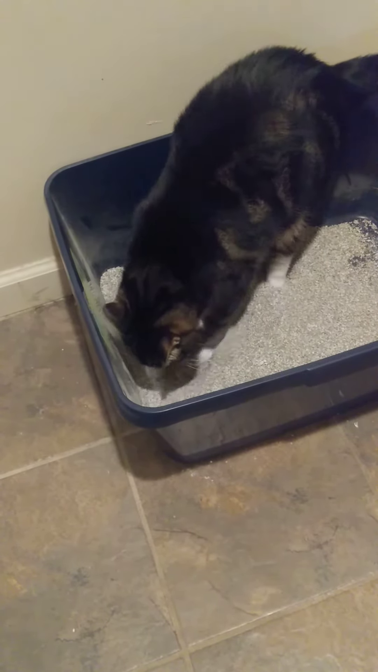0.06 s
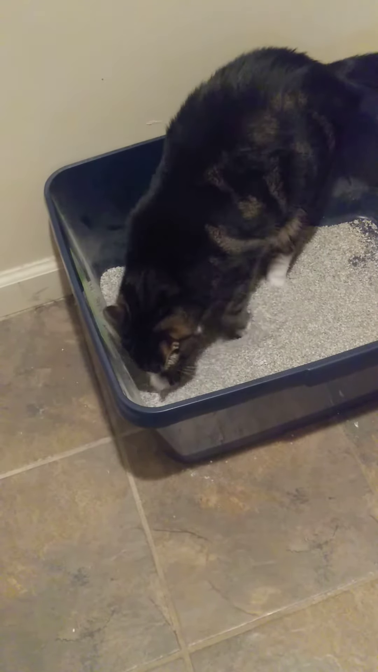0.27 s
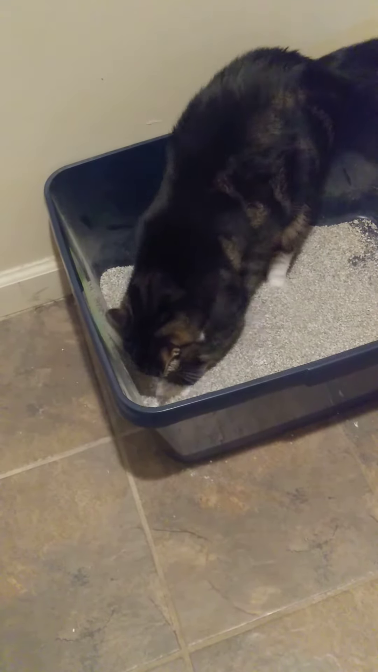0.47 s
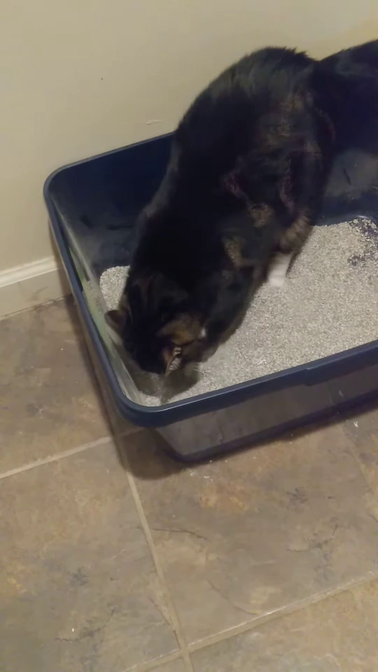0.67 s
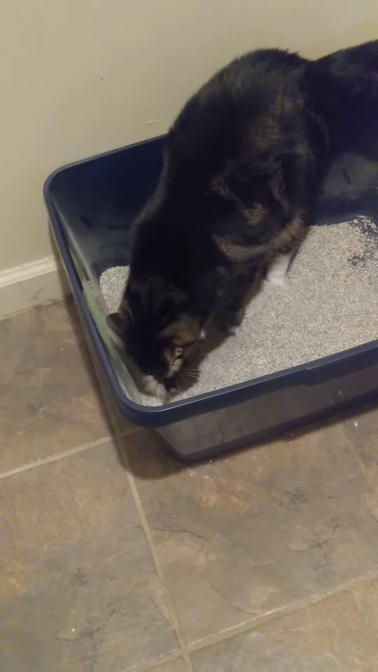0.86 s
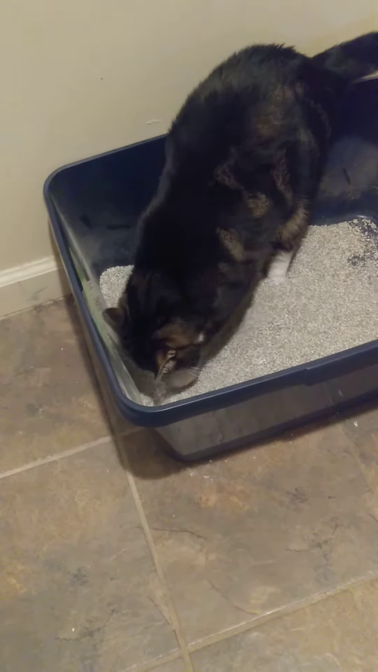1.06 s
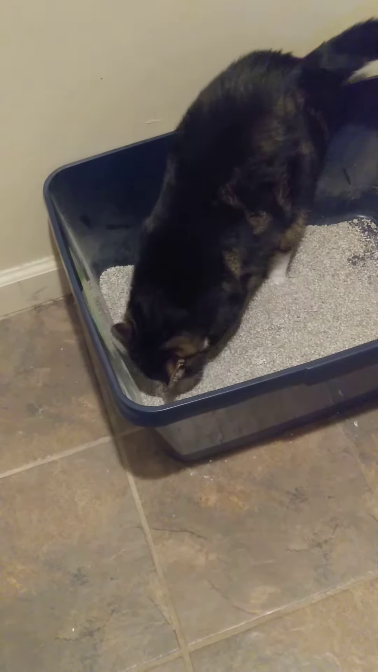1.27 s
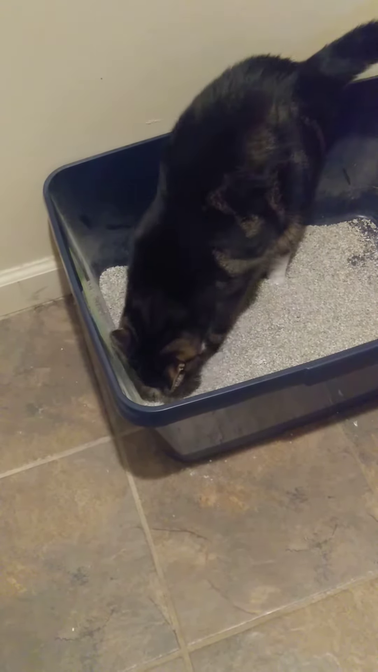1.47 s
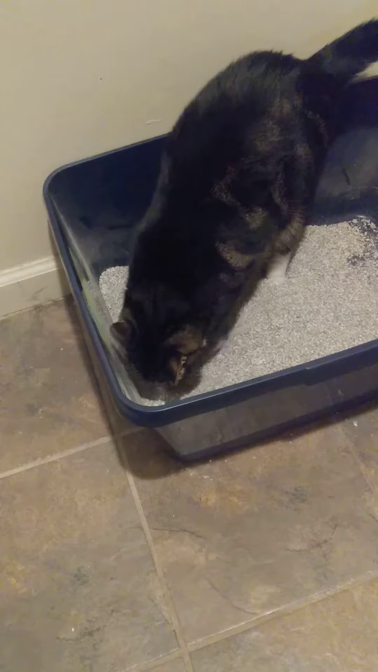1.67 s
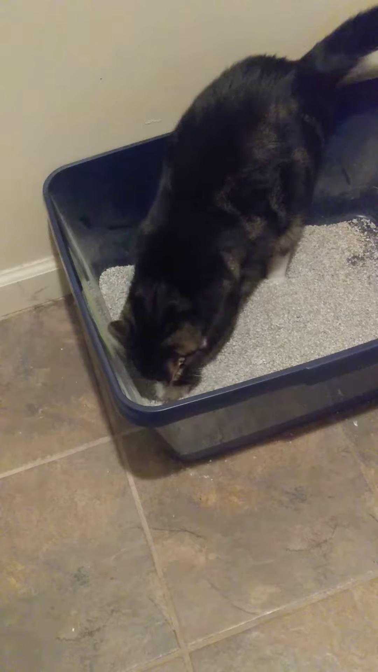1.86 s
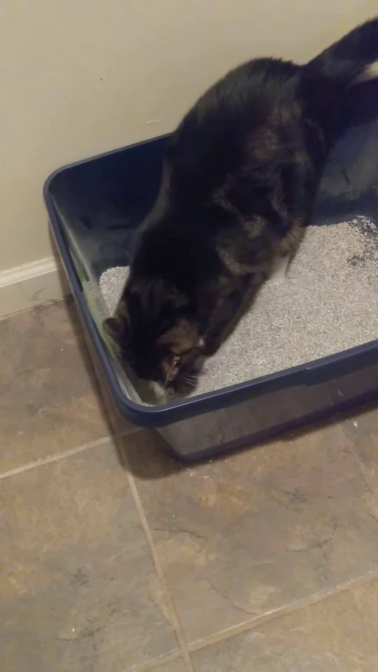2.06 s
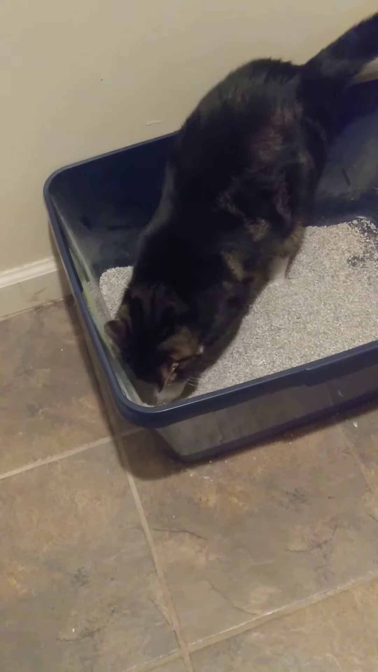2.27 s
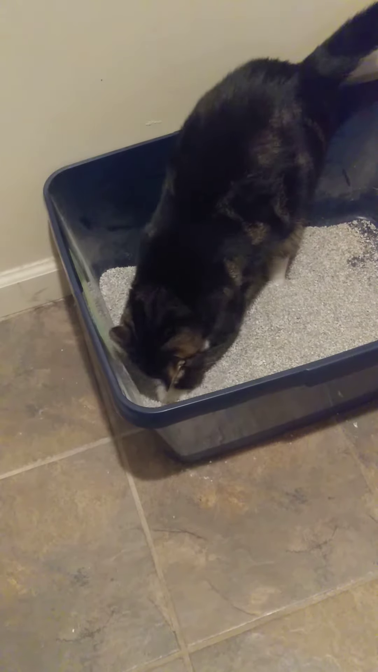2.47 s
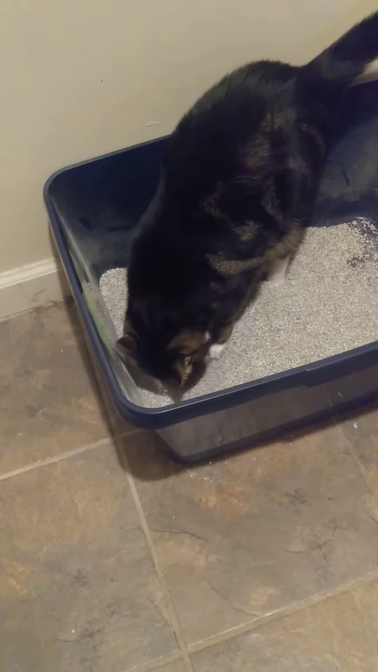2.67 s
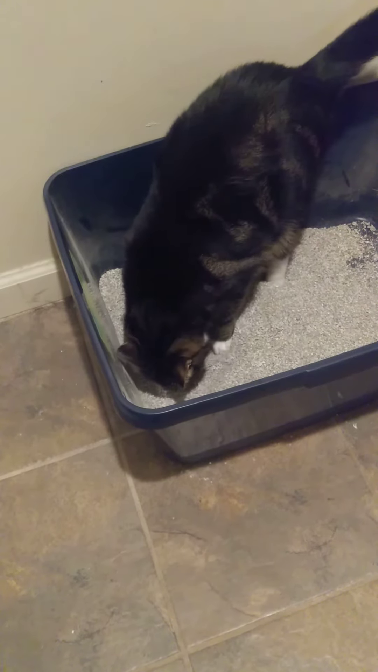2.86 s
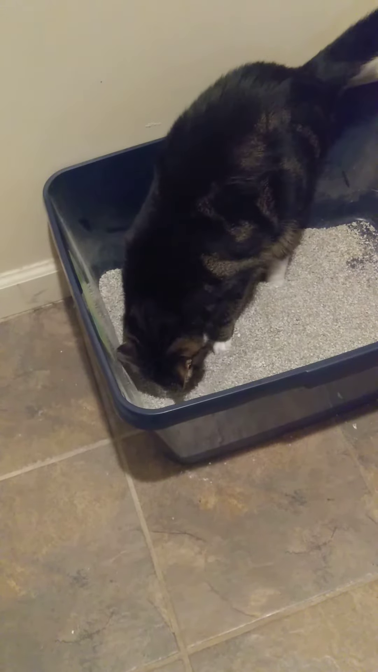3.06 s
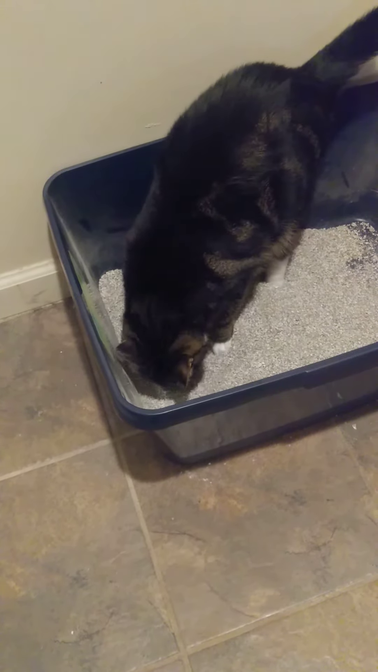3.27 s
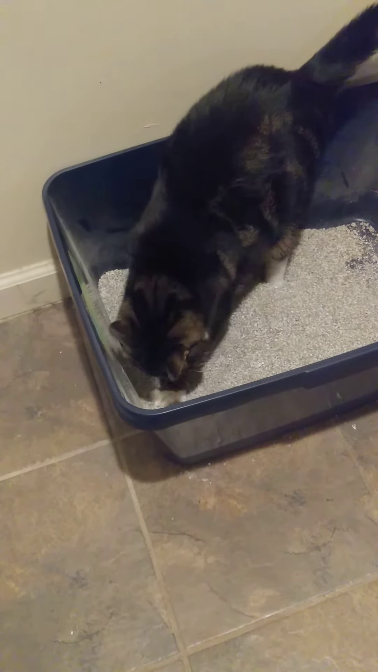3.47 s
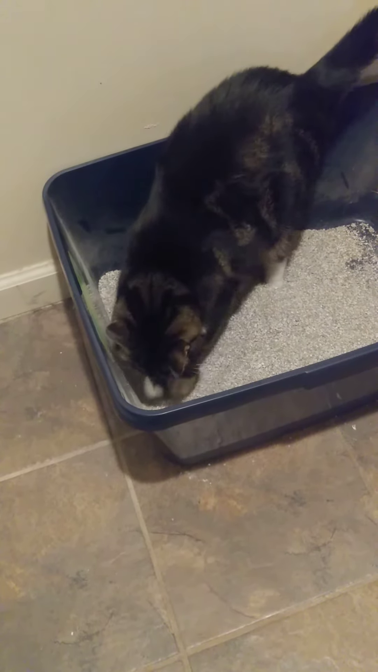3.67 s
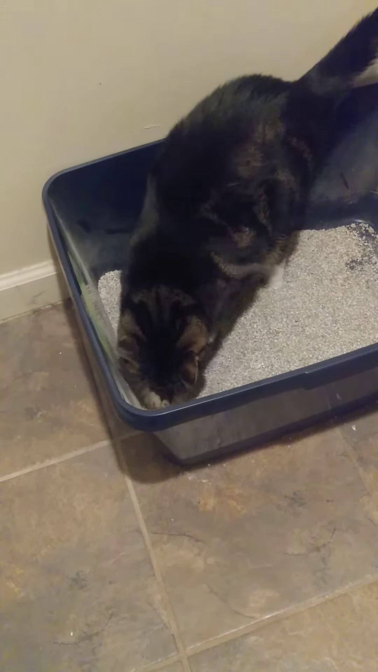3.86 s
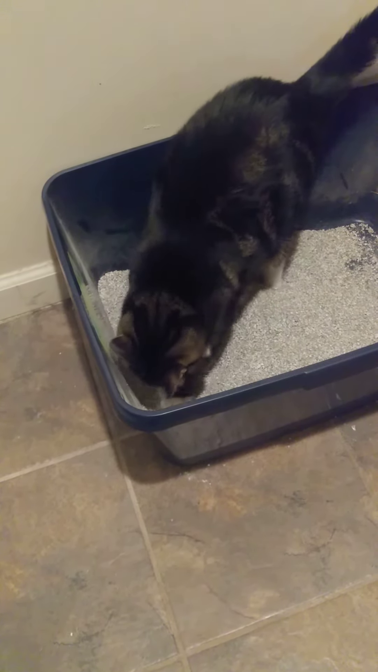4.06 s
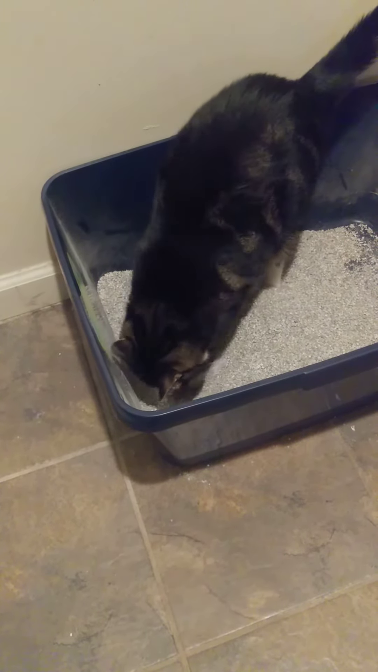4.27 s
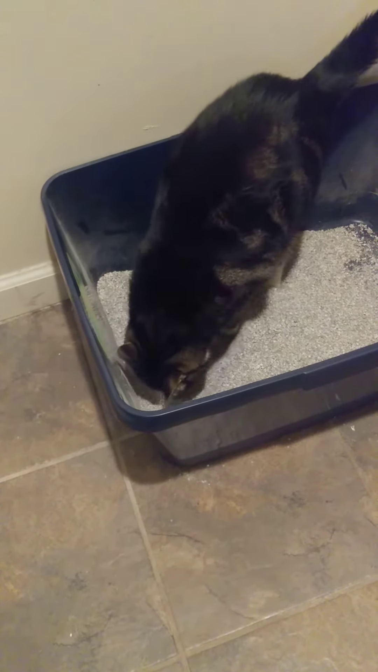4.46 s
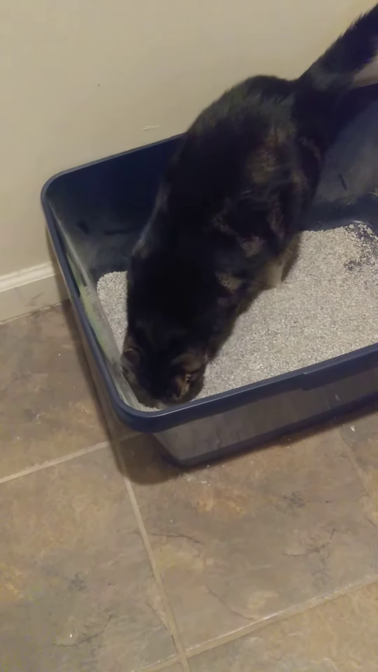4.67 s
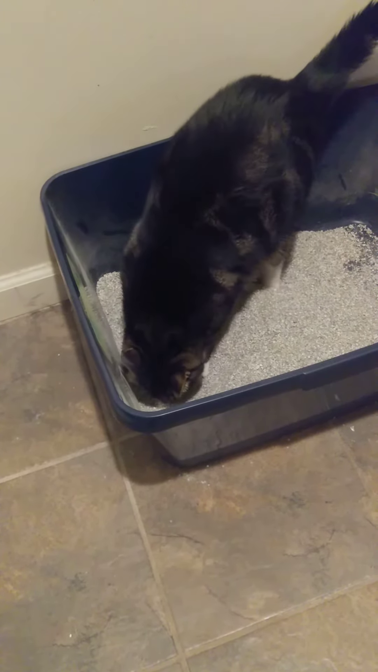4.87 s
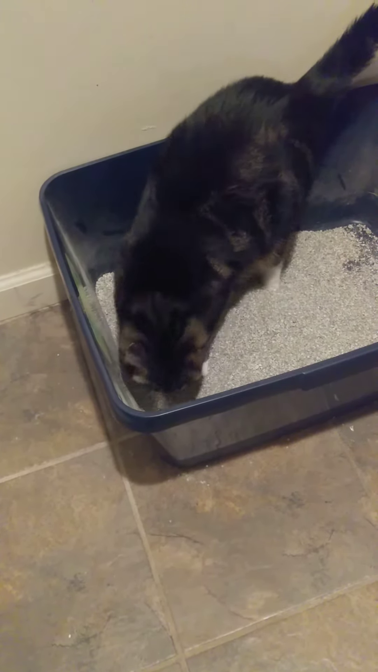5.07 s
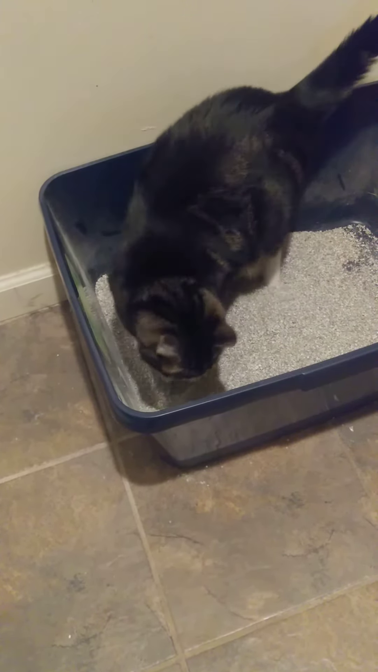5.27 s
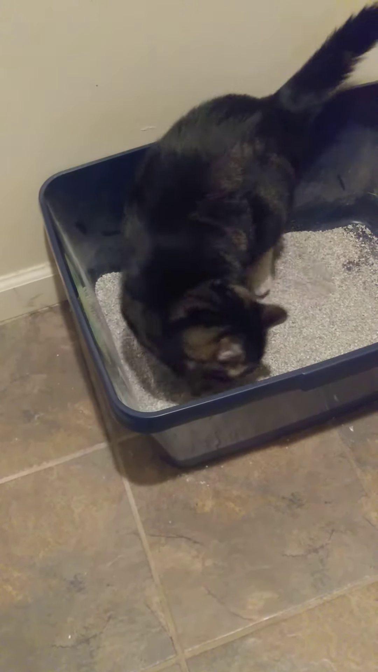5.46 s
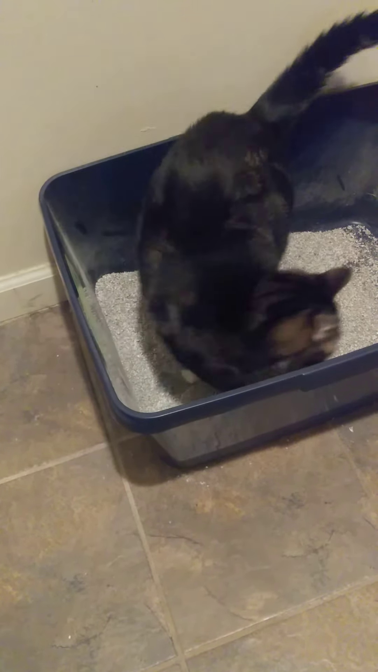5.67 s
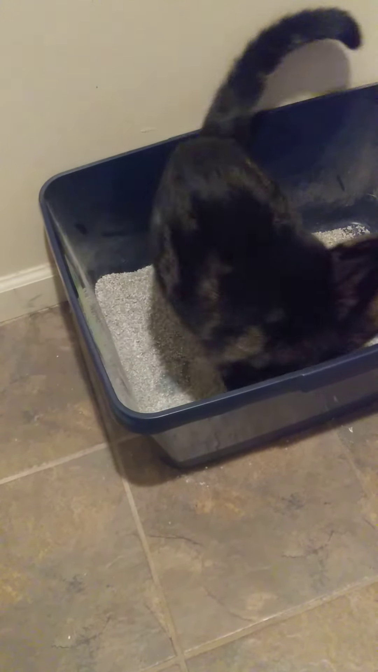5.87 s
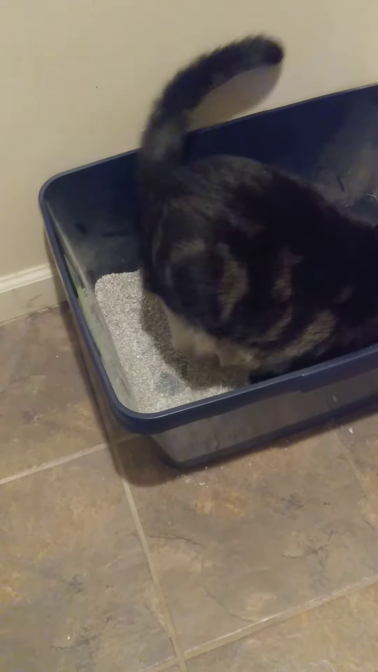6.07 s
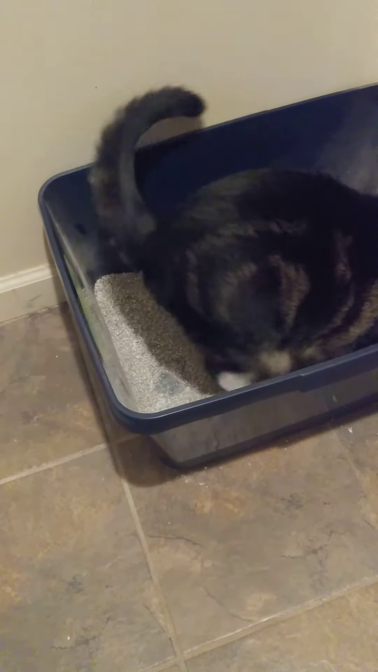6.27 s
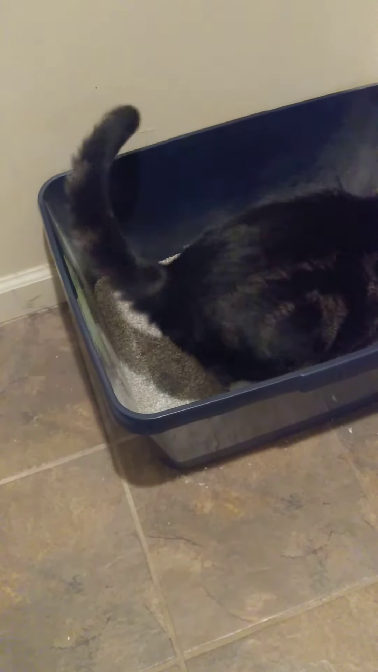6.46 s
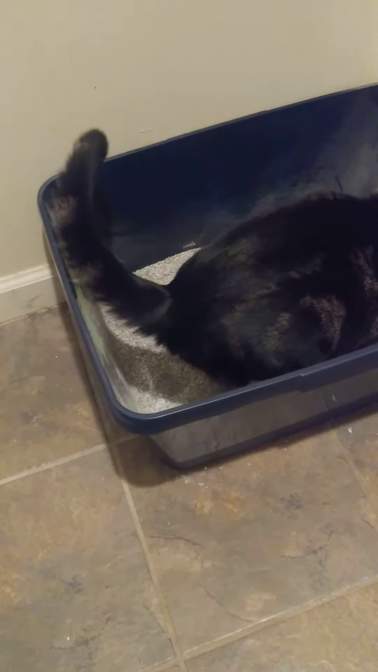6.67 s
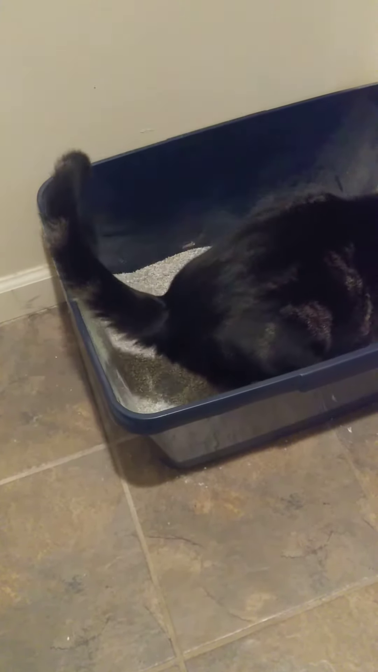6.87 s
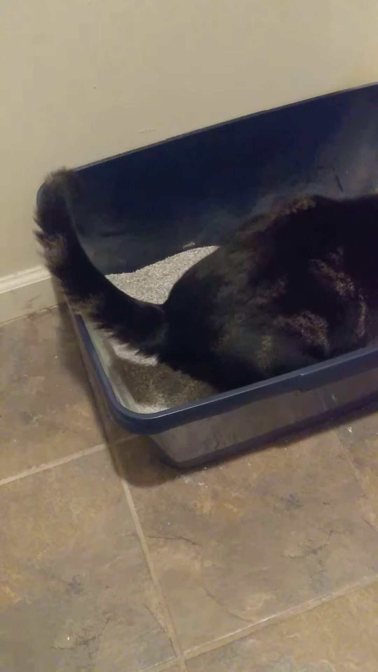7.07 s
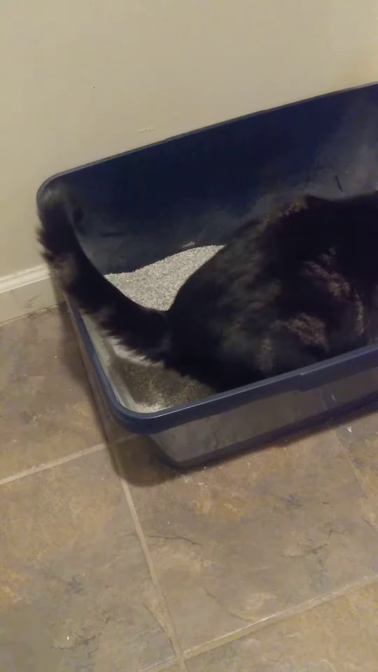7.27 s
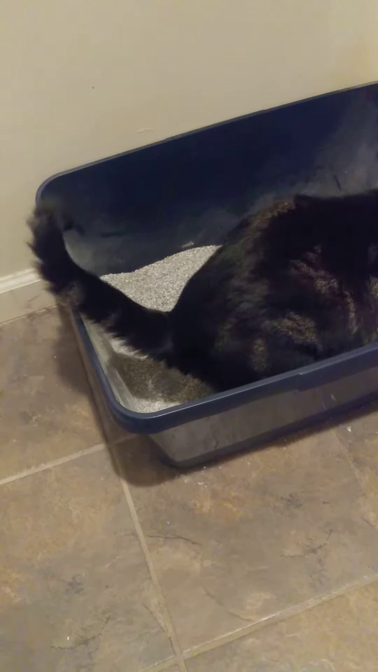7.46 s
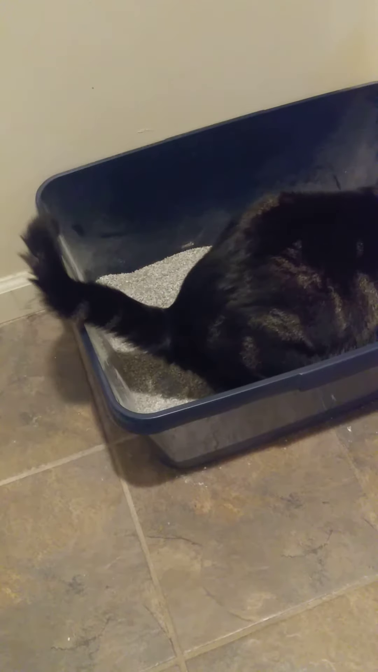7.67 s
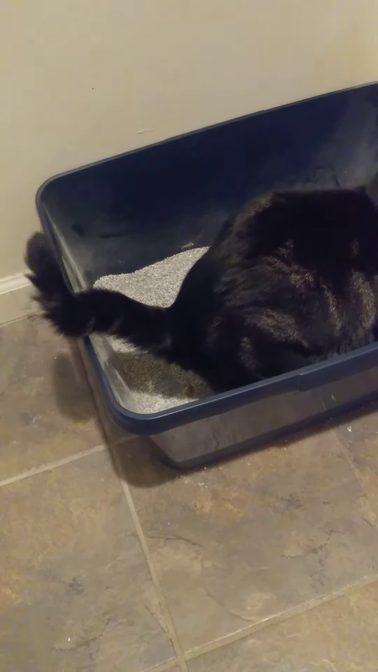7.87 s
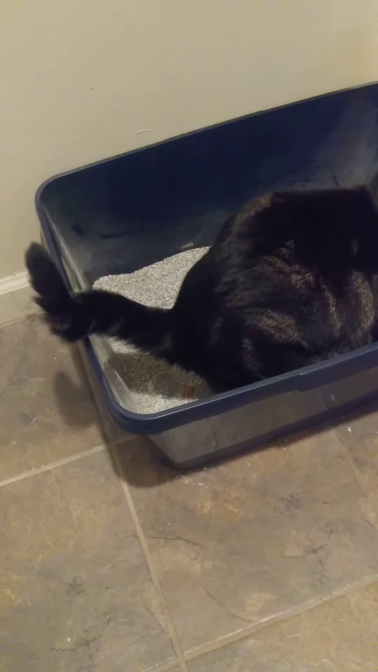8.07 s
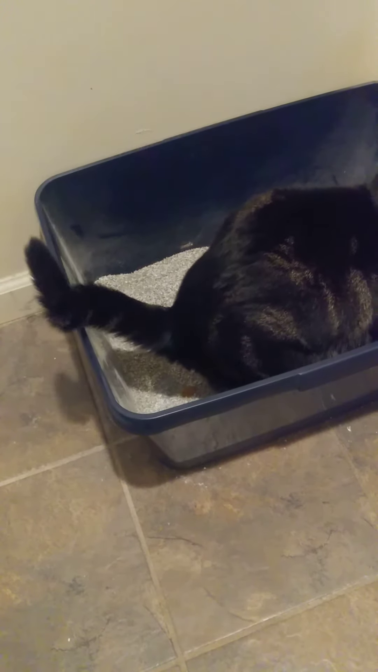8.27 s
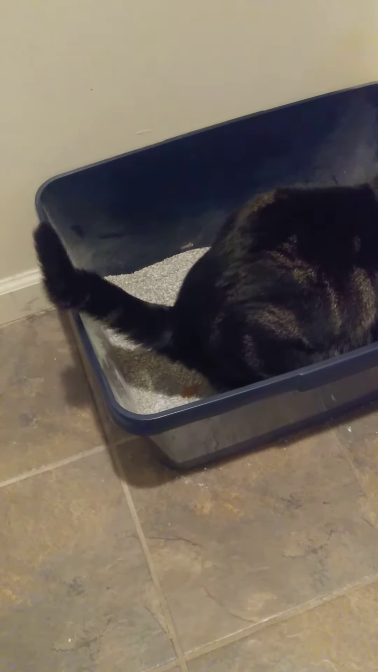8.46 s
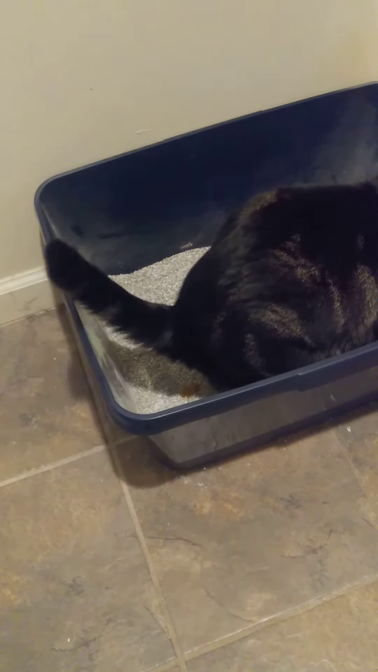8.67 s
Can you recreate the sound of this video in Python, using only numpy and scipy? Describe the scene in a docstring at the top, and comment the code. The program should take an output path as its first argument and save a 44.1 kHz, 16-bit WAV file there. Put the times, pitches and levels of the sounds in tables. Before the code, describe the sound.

A cat digs in a plastic litter tub, crunchy rasping strokes of gritty grains ending in bright hisses, over a steady low fan hum.

```python
"""Cat digging in a litter tub

A cat digs in a plastic tub of granular litter in a small tiled room, then turns round and settles.
Each paw stroke presses into the bed (a deep crunch), rasps along a furrow, then sweeps grains aside
(a bright hiss); all are random grain collisions, and crunch, rasp and scuffs also ring the tub.
Filtered clicks make grains and claws tick on the plastic; noise and sines make a steady background fan."""
import sys
import numpy as np
from scipy import signal
from scipy.fft import rfft, irfft
from scipy.io import wavfile

SR = 44100
rng = np.random.default_rng(int(sys.argv[2]) if len(sys.argv) > 2 else 0)


def materialize(psi):
    """Save the field psi as 16-bit PCM at rate SR to the path in sys.argv[1].

    A 1-D psi becomes a single channel; in a 2-D psi each row is a channel.
    """
    bounded = np.clip(np.atleast_2d(psi).T, -1, 1)
    quanta = np.round(bounded * 32767).astype(np.int16)
    wavfile.write(sys.argv[1], SR, quanta)


N = 384111
TIME = np.arange(N) / SR

# colour of a grain or claw hitting hard plastic: (frequency [Hz], level [dB])
HARD_CONTACT_COLOUR = [(500, -30), (2500, -13), (5500, 2.5), (9000, 4.5), (12000, 0), (16000, -14)]
# colour of a little burst of grain contacts: (frequency [Hz], level [dB])
SCUFF_COLOUR = [(300, -35), (1450, -4), (1900, -2.5), (3500, -2), (6000, -1.5), (9000, -0.5),
                (16000, -13.5)]


def from_db(db):
    """Decibels to gain."""
    return 10 ** (np.asarray(db) / 20)


def rms_one(x):
    """Scale to an rms of 1."""
    return x / np.sqrt(np.mean(x ** 2) + 1e-20)


def drift(rate):
    """Smooth random wander with spread 1, changing about `rate` times a second."""
    step = 40   # samples between the points of the slow curve
    r = np.exp(-2 * step * np.pi * rate / SR)
    noise = rng.standard_normal(N // step + 2002)
    slow = signal.lfilter([1], [1, -2 * r, r * r], noise)[2000:]   # drop the filter's run-in
    return np.interp(np.arange(N) / step, np.arange(len(slow)), rms_one(slow))


def low_pass(x, hz, order=3):
    """Keep what lies below a frequency."""
    return signal.sosfilt(signal.butter(order, hz, fs=SR, output="sos"), x)


def high_pass(x, hz, order=3):
    """Keep what lies above a frequency."""
    return signal.sosfilt(signal.butter(order, hz, "high", fs=SR, output="sos"), x)


def impulse_response(spectrum, size=4096):
    """Causal (minimum-phase) response with the given spectrum."""
    hz, db = np.transpose(spectrum)
    grid = np.maximum(np.arange(size // 2 + 1) * SR / size, 1)
    level_db = np.interp(np.log(grid), np.log(hz), db)
    cepstrum = irfft(np.log(from_db(level_db)))
    # folding the cepstrum forwards puts all the energy after time zero
    cepstrum[1:size // 2] *= 2
    cepstrum[size // 2 + 1:] = 0
    return irfft(np.exp(rfft(cepstrum)))


def coloured(x, spectrum):
    """Filter by a spectrum so that white noise keeps its level."""
    response = impulse_response(spectrum)
    return signal.oaconvolve(x, response / np.linalg.norm(response))[:N]


def resonance(x, hz, width_hz):
    """Two-pole resonance with gain 1 on top."""
    r = np.exp(-np.pi * width_hz / SR)
    feed = np.array([1, 0, -1]) * (1 - r * r) / 2
    return signal.lfilter(feed, [1, -2 * r * np.cos(2 * np.pi * hz / SR), r * r], x)


def ringing(x, modes):
    """Drive a body's modes side by side."""
    return sum(from_db(db) * resonance(x, hz, width) for hz, width, db in modes)


def strikes(table):
    """One click for each row of (time, level)."""
    clicks = np.zeros(N)
    for s, db in table:
        clicks[int(s * SR)] += from_db(db)
    return clicks


def decaying(clicks, decay_s):
    """Let every click die away exponentially."""
    # the tiny offset here and elsewhere keeps silent filters from slowing down
    return signal.lfilter([1], [1, -np.exp(-1 / (decay_s * SR))], clicks + 1e-18)


def grains(gain, most_per_s, spread_db, clump_db):
    """Grain collisions: a stronger stroke moves more grains, and they slip in clumps."""
    chance = np.clip(most_per_s * np.sqrt(gain / gain.max()) / SR, 1e-3, 1)
    size_db = spread_db * np.clip(rng.standard_normal(N), -2.5, 2.5)
    sizes = rms_one(from_db(size_db) * rng.choice([-1, 1], N))
    hits = (rng.random(N) < chance) * sizes / np.sqrt(chance)   # even power at any density
    clumps = rms_one(from_db(clump_db * drift(94)))
    return gain * hits * clumps


def fan(ring_waver_db=2.0, phase_wander=0.29):
    """Air rushing through a ringing housing, with nearly steady tones and a low hum."""
    # rushing air: (frequency [Hz], level [dB])
    air_colour = [(25, -51), (45, -47), (90, -19), (150, -12), (210, -3), (280, -2), (360, -3.5), (450, -9),
                  (700, -11.5), (1000, -15.5), (2000, -23.5), (3400, -25.5), (4200, -29.5), (16000, -37)]
    # housing modes ringing in the draught: (frequency [Hz], width [Hz], level [dB])
    housing_modes = [(1724, 56, -69.5), (2300, 140, -69), (2627, 41, -71.5), (3310, 57, -72)]
    # tones of the fan and its motor: (frequency [Hz], level [dB])
    motor_tones = [(166, -67.5), (236.9, -47.5), (255, -57), (289, -57.5), (355.3, -57), (381, -64.5),
                   (414.5, -66), (829, -72), (1007, -69.5), (1125, -67), (1319, -72), (1421, -78.5),
                   (1755, -72.5), (2234, -71.5)]
    air_db = -50
    hum_hz, hum_db = 58.4, -74.5
    air = from_db(air_db) * coloured(rng.standard_normal(N), air_colour)
    draught = rng.standard_normal(N)
    housing = 0
    for hz, width_hz, db in housing_modes:
        level = from_db(db + ring_waver_db * drift(4))
        housing = housing + level * rms_one(resonance(draught, hz, width_hz))
    hum = from_db(hum_db) * np.sin(2 * np.pi * hum_hz * TIME)
    for hz, db in motor_tones:
        phase = 2 * np.pi * (hz * TIME + rng.random()) + phase_wander * drift(3.1)
        hum = hum + from_db(db) * np.sin(phase)
    return air + housing + np.sqrt(2) * hum   # sqrt(2): tone levels are rms


def paw_strokes():
    """Each stroke pushes in, drags and lets go, turning from crunch to hiss.

    Gives amplitudes of crunch, rasp, hiss and boom, the paw's travel (0-1) and rasp brightness (dB)."""
    # the paw digs or steps through the litter: (start [s], push-in [s], drag [s], crunch [dB], rasp [dB],
    # hiss [dB], rasp brightness [dB], tub boom [dB])
    paw_moves = [ (-0.028, 0.058, 0.053, -30.5, -27, -25.5, -1.5, -36),
                 (0.277, 0.026, 0.044, -36.5, -37, -38.5, 0, -54),
                 (0.315, .085, 0.048, -30, -30, -31, -3.5, -45),
                 (0.43, 0.063, 0.045, -45, -38.5, -31.5, -5, -55),
                 (0.591, .064, 0.1, -34, -31.5, -27, 2.5, -37.5),
                 (0.964, .06, 0.053, -28, -24.5, -23, -1.5, -34),
                 (1.264, 0.063, 0.081, -31, -29.5, -26.5, -3, -58),
                 (1.644, 0.0099, 0.1, -32, -29, -27.5, 3.5, -44),
                 (1.899, 0.071, 0.12, -34, -34, -30, -5, -42.5),
                 (2.207, 0.038, 0.12, -32, -31.5, -30.5, -3, -55),
                 (2.472, 0.057, 0.062, -28.5, -28, -28.5, -2, -41),
                 (3.462, .021, .033, -49, -60, -54, -10, -62),
                 (3.545, 0.093, 0.017, -32, -32.5, -36, -4.5, -58),
                 (3.685, .051, 0.02, -36.5, -25, -26.5, -1.5, -52),
                 (3.916, .035, 0.012, -38.5, -53.5, -50, -12, -45),
                 (4.001, 0.07, 0.039, -32.5, -31.5, -32.5, -3.5, -53),
                 (4.188, 0.047, 0.05, -26.5, -27.5, -26.5, -5, -37),
                 (4.493, 0.028, 0.079, -35, -35.5, -30, -2.5, -47.5),
                 (5.192, 0.028, 0.029, -41, -35.5, -45, -2, -55),
                 (5.726, .025, .047, -52.5, -60.5, -60.5, 4, -60),
                 (5.945, 0.014, 0.03, -65, -57, -51.5, -1, -65),
                 (6.01, 0.054, 0.048, -44.5, -46, -49, -1.5, -46),
                 (6.155, 0.016, .01, -61.5, -51.5, -60, -1, -58),
                 (6.262, 0.044, .011, -55, -56, -48, -1, -45.5),
                 (6.402, 0.032, 0.011, -53.5, -49.5, -61, 1, -65),
                 (6.566, 0.0088, 0.03, -63, -52.5, -48, 4.5, -64)]
    push_curve, hiss_push_curve = 1.17, 1.47   # powers of the rise while the paw pushes in
    # the claws bite deepest in the middle of the drag
    crunch_swell_db, rasp_swell_db = 1.3, 3.6
    # the weight comes off the paw over the drag
    crunch_fade_db, rasp_fade_db = 9.5, 2
    # the paw gathers speed from first touch to lift-off
    hiss_growth_db, brightening_db = 5, 0.5
    # after lift-off the grains settle [dB per s]; loose ones first keep sliding a little
    crunch_settle, rasp_settle, hiss_settle = 160.5, 181.5, 205.5
    hiss_run_on_s = 0.0081
    boom_reach_s = 0.048   # the floor's load falls to 1/e this far from the deepest push

    press, drag, sweep, load, travel, bright = np.zeros((6, N))
    for start, push_s, drag_s, crunch_db, rasp_db, hiss_db, bright_db, boom_db in paw_moves:
        span = slice(*np.searchsorted(TIME, [start, start + 1]))
        t = TIME[span] - start
        pushed = np.clip(t / push_s, 1e-9, 1)
        push = pushed ** push_curve
        dragged = np.clip((t - push_s) / drag_s, 0, 1)
        travelled = np.clip(t / (push_s + drag_s), 0, 1)
        lifted_s = np.maximum(t - push_s - drag_s, 0)
        bite = 4 * dragged * (1 - dragged)

        crunch_now = crunch_db + crunch_swell_db * bite - crunch_fade_db * dragged - crunch_settle * lifted_s
        press[span] += push * from_db(crunch_now)

        rasp_now = rasp_db + rasp_swell_db * bite - rasp_fade_db * dragged - rasp_settle * lifted_s
        rasping = push * from_db(rasp_now)
        drag[span] += rasping

        stopping_s = np.maximum(lifted_s - hiss_run_on_s, 0)
        hiss_now = hiss_db - hiss_growth_db * (1 - travelled) - hiss_settle * stopping_s
        sweep[span] += pushed ** hiss_push_curve * from_db(hiss_now)

        from_deepest = (t - push_s) / boom_reach_s
        load[span] += push * from_db(boom_db) * np.exp(-np.minimum(from_deepest ** 2, 20))

        # where strokes overlap, the louder one leads
        travel[span] += rasping * travelled
        bright[span] += rasping * (bright_db + brightening_db * (travelled - .5))
    return press, drag, sweep, load, travel / (drag + 1e-12), bright / (drag + 1e-12)


def shuffling():
    """Amplitude of the faint, uneven shifting of litter while the cat is on the move."""
    # the cat moves about in the tub: (from [s], to [s])
    active = [(0, 2.86), (3.46, 4.88), (5.24, 6.72)]
    level_db, swing_db, fade_s = -65.5, 0.5, 0.13
    moving = 0
    for start, end in active:
        inside_s = np.minimum(TIME - start, end - TIME)
        moving = moving + np.clip(inside_s / fade_s + .5, 0, 1)
    return moving * from_db(level_db + swing_db * drift(8))


def crunch(press):
    """Packed grains give way under the paw."""
    # deep crunch: (frequency [Hz], level [dB])
    crunch_colour = [(60, -55), (130, -21), (250, -2), (440, -9), (650, -1), (1000, 0), (1500, -15),
                     (3000, -8.5), (16000, -20.5)]
    return coloured(grains(press, most_per_s=9000, spread_db=0.0, clump_db=1.0), crunch_colour)


def rasp(drag, bright_db, level_db=-3.0, pivot_hz=2300):
    """Grains are dragged over the plastic; brightness tips their sound about the pivot frequency."""
    # scraping plastic: (frequency [Hz], level [dB])
    rasp_colour = [(200, -26.5), (800, -19), (1300, -1), (2200, 0), (2600, -1.5), (3500, -0.5),
                   (4500, -5.5), (7000, -6), (16000, -37)]
    grind = coloured(grains(drag, most_per_s=8000, spread_db=0.5, clump_db=2.0), rasp_colour)
    dull = low_pass(grind, pivot_hz)
    sharp = high_pass(grind, pivot_hz)
    return from_db(level_db) * (dull * from_db(-bright_db) + sharp * from_db(bright_db))


def furrow(drag, travel, count=10):
    """Scraping grains drive a broad furrow resonance that glides upwards with the paw's travel."""
    start_hz, rise_octaves, width_octaves, level_db = 817, 2.12, 0.44, -6.5
    scrape = grains(drag, most_per_s=5000, spread_db=2.5, clump_db=1.5)
    out = 0
    # cross-fade through a row of fixed resonances
    for place in np.linspace(0, 1, count):
        hz = start_hz * 2 ** (rise_octaves * place)
        width_hz = hz * width_octaves * np.log(2)
        near = np.exp(-((travel - place) * rise_octaves / width_octaves) ** 2)
        even_power = np.sqrt(SR / (np.pi * width_hz))
        out = out + resonance(scrape * near + 1e-18, hz, width_hz) * even_power
    return from_db(level_db) * out / 2


def slide(sweep, level_db=-.5, flicker_db=1.53, split_hz=6800):
    """Loose grains tumble in a bright hiss; coarse and fine ones slip in separate little surges."""
    # bright hiss: (frequency [Hz], level [dB])
    hiss_colour = [(300, -51), (1000, -13), (2200, -11), (3500, -1.5), (4800, -1.5), (6100, 0),
                   (8000, -3.5), (9300, -0.5), (10700, -8), (13000, -12), (16000, -21)]
    coarse = low_pass(grains(sweep, most_per_s=16000, spread_db=1.0, clump_db=3.1), split_hz)
    fine = high_pass(grains(sweep, most_per_s=20000, spread_db=2.5, clump_db=0.9), split_hz)
    surges = sum(size * from_db(flicker_db * drift(33)) for size in (coarse, fine))
    return from_db(level_db) * coloured(surges, hiss_colour)


def booms(load, lowest_hz=130):
    """The loaded floor answers the grinding with its low modes; it is too small to radiate deep bass."""
    # low modes of the tub floor: (frequency [Hz], width [Hz], level [dB])
    floor_modes = [(173, 13, -32), (218, 14, -19), (239, 41, 9), (329, 8.3, 14), (404, 37, -18)]
    grind = load * rng.standard_normal(N)
    boom = high_pass(ringing(grind + 1e-18, floor_modes), lowest_hz, order=2)
    return rms_one(boom) * np.std(grind)


def strays(sweep, moving, resting_per_s=4, moving_per_s=80, level_db=-39):
    """Single grains hop and drop: a few at rest, many as the cat moves, harder ones in a sweep."""
    growth, reference_db = 0.2, -62   # force grows by this power of the sweep over the reference
    per_s = resting_per_s + moving_per_s * moving
    force = (1 + sweep / from_db(reference_db)) ** growth
    drops = (rng.random(N) < per_s / SR) * rng.uniform(-1, 1, N)
    return from_db(level_db) * coloured(drops * force, HARD_CONTACT_COLOUR)


def crumbles(moving, per_s=11, level_db=-47, decay_s=.003):
    """Small clumps break at random while the cat moves about, each in a tiny burst of grains."""
    breaks = (rng.random(N) < moving * per_s / SR) * rng.random(N)
    burst = decaying(breaks, decay_s) * rng.standard_normal(N)
    return from_db(level_db) * coloured(burst, SCUFF_COLOUR)


def ticks(chatter_db=-14, chatter_s=.0012):
    """Grains and claws hit the wall hard, each with about a millisecond of chatter."""
    # hits on the wall: (time [s], level [dB])
    wall_hits = [(0.093, -7), (1.2354, -17), (3.4118, -26), (4.0053, -22), (4.0308, -6), (4.6308, -6),
                 (4.8908, -33), (5.0394, -33), (5.233, -20), (5.5029, -34), (5.5413, -31), (5.5934, -32),
                 (5.7354, -32), (6.0875, -14.5), (6.1759, -25), (6.2402, -29), (6.273, -28), (6.2971, -27),
                 (6.3123, -16), (6.3889, -29.5), (6.5914, -24.5), (6.629, -24)]
    clicks = strikes(wall_hits)
    chatter = decaying(clicks, chatter_s) * rng.choice([-1, 1], N)
    return coloured(clicks + from_db(chatter_db) * chatter, HARD_CONTACT_COLOUR)


def scuffs(level_db=-12):
    """A claw catches: a sudden burst of grain contacts that quickly dies away."""
    # catching claws: (time [s], level before the overall trim [dB], decay [s])
    claw_catches = [(0.984, -27, 0.012), (1.655, -10.5, .01), (2.224, -20, 0.0096), (3.427, -18.5, 0.0088),
                    (3.4523, -19.5, 0.0029), (4.208, -16.5, 0.013), (4.512, -20, 0.01), (4.622, -16, 0.018),
                    (5.207, -23, 0.015), (5.602, -30.5, 0.0072), (5.734, -28.5, .005),
                    (6.314, -21.5, 0.0037), (6.5707, -23, 0.005), (6.629, -21.5, 0.005)]
    burst = 0
    for start_s, db, decay_s in claw_catches:
        fall = np.exp(-np.clip((TIME - start_s) / decay_s, 0, 20))
        burst = burst + from_db(db) * (TIME >= start_s) * fall
    return from_db(level_db) * coloured(burst * rng.standard_normal(N), SCUFF_COLOUR)


def thumps(floor_hz=48, width_hz=45):
    """The cat's weight gives the tub floor a soft, damped push."""
    # weight landing on the floor: (time [s], level [dB])
    weight_shifts = [(1.652, -50)]
    landings = strikes(weight_shifts)
    push = low_pass(resonance(landings + 1e-18, floor_hz, width_hz), 130, order=2)
    return push / np.abs(push).max() * landings.max()


def tub(on_plastic):
    """Contact with the plastic rings the tub and the air in it."""
    # resonances of tub and air: (frequency [Hz], width [Hz], level [dB])
    tub_modes = [(527, 18, 6), (550, 7.5, -37), (581, 29, -4), (619.4, 13, 4.5), (683, 24, 4),
                 (720, 6.8, 5), (786, 13, 3), (842, 12, 0.5), (1010, 17, -30), (956, 11.7, 6),
                 (1045, 15, 2), (1133, 8.7, -29), (1280, 40, 3.5), (1422, 8.3, 5), (1430, 13, -14),
                 (1570, 25, 1), (1820, 26, 1.5), (1946, 55, -3.5), (2126, 32, 5), (2090, 12, -28),
                 (2244, 36, 2), (2310, 37, -6), (2790, 70, -1), (3050, 38, -34), (3436, 32, 5),
                 (3970, 57, -2)]
    return ringing(on_plastic, tub_modes)


def room(x, split_hz=7000, first_echo_s=.003, treble_db=1.5):
    """Dense reflections from tiles and walls; the treble starts slightly stronger but dies sooner."""
    t60_s, treble_t60_s = 0.39, 0.097   # time to fall by 60 dB
    t = TIME[:SR // 2]
    noise = rng.standard_normal(len(t))
    low = low_pass(noise, split_hz) * from_db(-60 * t / t60_s)
    high = high_pass(noise, split_hz) * from_db(treble_db - 60 * t / treble_t60_s)
    tail = (low + high) * (t > first_echo_s)
    return signal.oaconvolve(x, tail / np.linalg.norm(tail))[:N]


def scene(direct_db=-2.0, room_db=-7.5):
    """The litter tub in its room, over the fan."""
    press, drag, sweep, load, travel, bright_db = paw_strokes()
    shuffle = shuffling()
    moving = shuffle > 0
    on_plastic = crunch(press + shuffle) + rasp(drag + shuffle, bright_db) + furrow(drag, travel) + scuffs()
    loose = slide(sweep + shuffle) + strays(sweep, moving) + crumbles(moving)
    direct = from_db(direct_db) * on_plastic + loose + ticks() + thumps()
    body = tub(on_plastic) + booms(load)
    return (direct + body + from_db(room_db) * room(direct) + fan())[None]


def record(dry, cutoff_hz=15750):
    """The microphone colours the sound and the top is cut steeply."""
    # microphone response, its port resonating near 9 kHz: (frequency [Hz], level [dB])
    microphone_colour = [(7000, 0), (8100, -2.5), (9300, 4.5), (9900, 1), (10900, -7), (13000, -9.5),
                         (15600, -3)]
    heard = signal.oaconvolve(dry, impulse_response(microphone_colour)[None], axes=1)[:, :N]
    return signal.sosfilt(signal.ellip(12, .1, 80, cutoff_hz, fs=SR, output="sos"), heard)


dry = scene()
out = record(dry)
materialize(out)
```